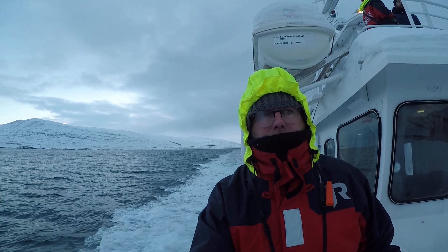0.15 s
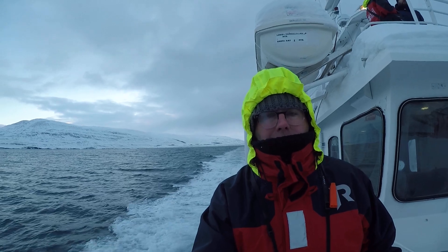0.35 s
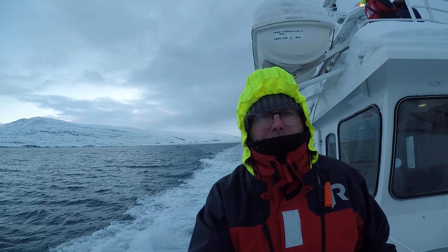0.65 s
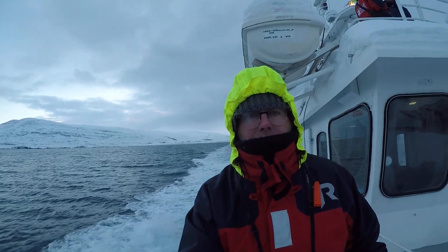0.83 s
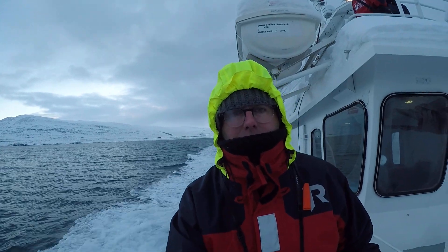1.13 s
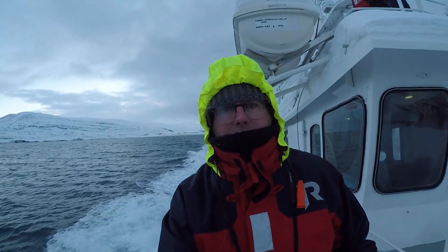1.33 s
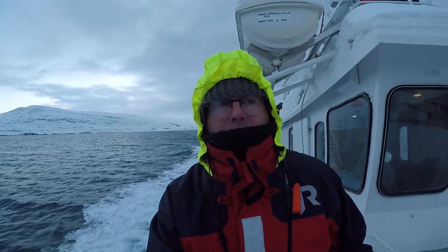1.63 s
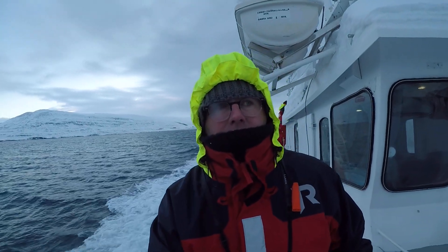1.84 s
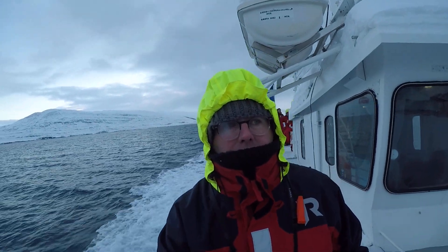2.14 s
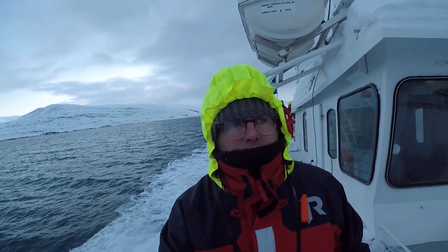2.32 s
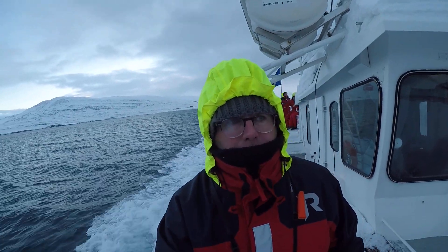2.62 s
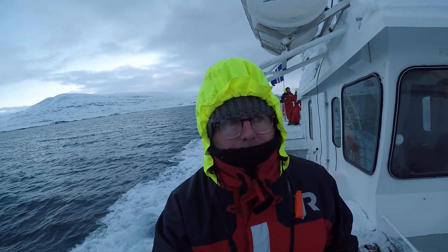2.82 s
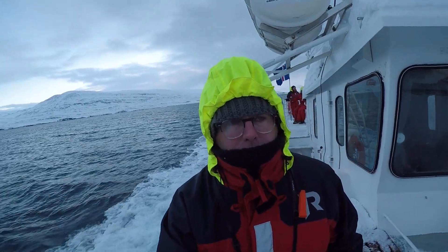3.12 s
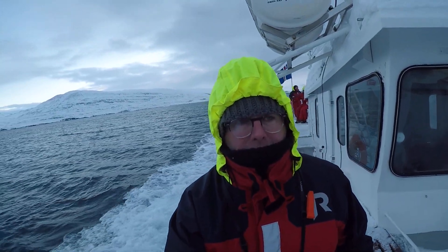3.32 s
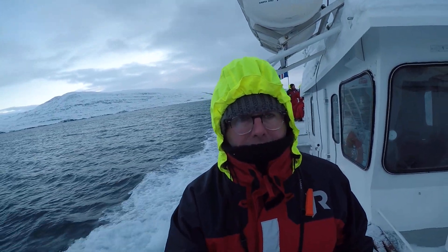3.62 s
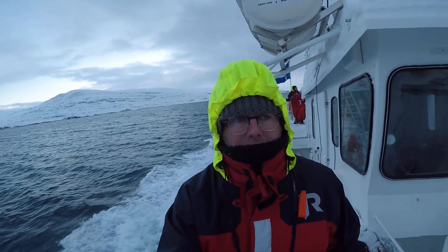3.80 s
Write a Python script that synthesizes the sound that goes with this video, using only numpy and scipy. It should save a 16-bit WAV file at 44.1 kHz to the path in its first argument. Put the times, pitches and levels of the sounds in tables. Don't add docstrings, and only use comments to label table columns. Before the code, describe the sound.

Boat engines drone deeply, two nearly matched low hums beating against each other, over exhaust rumble, churning foam and hissing spray; continuous, on an open side deck at sea, through a slightly muffled boxed microphone.

```python
import sys
import numpy as np
from scipy import signal
from scipy.fft import rfft, irfft
from scipy.io import wavfile

SR = 44100
rng = np.random.default_rng(int(sys.argv[2]) if len(sys.argv) > 2 else 0)


def pcm_store(signal):
    levels = np.round(np.clip(np.atleast_2d(signal), -1, 1) * 32767)
    wavfile.write(sys.argv[1], SR, levels.astype(np.int16).T)


def decibels_to_gain(level_db):
    exponent = np.asarray(level_db, float) / 20
    return 10 ** exponent


N = 174636

NEAR_HZ, FAR_HZ = 40.186, 41.787
IN_STEP_S = 2.5841


def rms_one(x):
    return x / np.sqrt(np.mean(x ** 2) + 1e-20)


def in_time(rows):
    start_s, *columns = np.transpose(rows)
    return [np.interp(np.arange(N) / SR, start_s, column) for column in columns]


def drift(rate_hz):
    r = np.exp(-80 * np.pi * rate_hz / SR)
    noise = rng.standard_normal(N // 40 + 2002)
    slow = signal.lfilter([1], [1, -2 * r, r * r], noise)[2000:]
    return np.interp(np.arange(N) / 40, np.arange(len(slow)), rms_one(slow))


def patchy(x, spectrum, patchy_db, rate_hz, swing=lambda hz: 0):
    hz = np.maximum(np.arange(N // 2 + 1) * SR / N, 1)
    point_hz, point_db = np.transpose(spectrum)
    colour_db = np.interp(np.log(hz), np.log(point_hz), point_db, left=-99, right=-99)
    coloured = rfft(x) * decibels_to_gain(colour_db)
    together = drift(rate_hz)
    place = 3 * np.log2(hz)
    first, last = int(3 * np.log2(point_hz[0])), int(3 * np.log2(point_hz[-1])) + 1
    out = 0
    for k in range(first, last + 1):
        window = np.cos(np.pi / 2 * np.clip(place - k, -1, 1)) ** 2
        band = irfft(coloured * window, N)
        flicker_db = patchy_db * (0.6 * together + drift(rate_hz))
        out = out + band * decibels_to_gain(flicker_db + swing(2 ** (k / 3)))
    return rms_one(out)


def engine(firing_hz, orders):
    wander_rad, wander_db = 0.03, 0.3
    steady = 2 * np.pi * firing_hz * (np.arange(N) / SR - IN_STEP_S)
    turn = steady + wander_rad * drift(2.8)
    drone = 0
    for multiple, level_db in orders:
        drone = drone + decibels_to_gain(level_db + wander_db * drift(4.1)) * np.cos(multiple * turn)
    return drone


# multiple [of firing rate], level_db [peak dB]
NEAR_TONES = [(2, -10.8), (3, -26.3), (1, -42), (1.758, -35), (5, -41)]
# [dB, exhaust roar]
ENGINE_LOAD = [
    (0, -1.2, -0.5),
    (.6, -0.5, 4.5),
    (1.2, -1, 4.5),
    (1.7, 1, 1),
    (2.3, 1.1, 0),
    (2.8, 1, -5),
    (3.2, .8, -2.5),
    (3.96, -1.7, 0),
]


def near_engine():
    drone_db = in_time(ENGINE_LOAD)[0]
    return decibels_to_gain(drone_db) * engine(NEAR_HZ, NEAR_TONES)


# multiple [of firing rate], level_db [peak dB]
FAR_TONES = [(2, -18.2), (3, -29), (1, -36), (4, -29), (5, -32), (8 / 3, -33), (5 / 3, -37)]


def far_engine():
    return engine(FAR_HZ, FAR_TONES)


def difference_tone():
    pitch_hz = 2 * (2 * NEAR_HZ - FAR_HZ)
    return -decibels_to_gain(-33) * np.cos(2 * np.pi * pitch_hz * (np.arange(N) / SR - IN_STEP_S))


# pitch_hz [Hz], level_db [dB per Hz]
RUMBLE_COLOUR = [(6, -17), (27, -9.5), (42, -5), (66, -2.5), (86, -4.5), (122, -0.5), (160, -7), (420, -21)]


def rumble():
    roar_db = in_time(ENGINE_LOAD)[1]
    swing = lambda hz: roar_db * (95 < hz < 150)
    noise = rng.standard_normal(N)
    return decibels_to_gain(-21.5) * patchy(noise, RUMBLE_COLOUR, patchy_db=0.3, rate_hz=5.1, swing=swing)


# [dB, deep wash]
CHURNING = [(0.12, -24.5, -29.5), (0.28, -24.5, -25), (0.56, -21.5, -29), (0.86, -24.5, -31.5),
            (1.73, -25.5, -31.5), (1.77, -23, -27), (1.8, -24, -36), (1.84, -22.5, -29), (2.11, -24, -30),
            (2.16, -28, -33), (2.21, -27, -26.5), (2.28, -27, -31.5), (2.44, -24, -33), (2.77, -27, -35.5),
            (3.05, -26, -32), (3.21, -25, -34), (3.92, -23, -34)]
# pitch_hz [Hz], level_db [dB per Hz]
FOAM_COLOUR = [(150, -30), (250, -1), (313, -4.5), (750, -5), (1820, -2.5), (2370, -5), (3200, -14.5),
               (4160, -23), (7040, -120)]


def foam():
    bubbles_per_s, bubble_db, deep_hz = 2500, -9, 800
    level_db, deep_db = in_time(CHURNING)
    sizes = decibels_to_gain(2.95 * np.minimum(rng.exponential(1, N), 5))
    bursts = sizes * (rng.random(N) < bubbles_per_s / SR)
    pitch_number = rng.integers(0, 20, N)
    rings = 0
    for k, hz in enumerate(np.geomspace(400, 2800, 20)):
        r = np.exp(-np.log(1000) * hz / (9.0 * SR))
        w = 2 * np.pi * hz / SR
        hits = bursts * (pitch_number == k) + 1e-18
        ring = signal.lfilter([0, np.sin(w)], [1, -2 * r * np.cos(w), r * r], hits)
        rings = rings + ring * np.sqrt(hz)
    water = 0.43 * decibels_to_gain(bubble_db) * rms_one(rings) + rng.standard_normal(N)
    apart_db = 0.63 * (deep_db - deep_db.mean() - level_db + level_db.mean())
    swing = lambda hz: (290 < hz < deep_hz) * apart_db
    return decibels_to_gain(level_db + 2.0) * patchy(water, FOAM_COLOUR, patchy_db=0.4, rate_hz=5.4, swing=swing)


# [dB, fine mist]
SPRAY_THROWN = [(0.12, -25.5, -45), (0.52, -24, -49), (1.24, -26.5, -47.5), (1.32, -27.5, -49),
                (1.62, -25.5, -45), (1.9, -25, -45.5), (2.09, -28, -49.5), (2.11, -27, -47.5),
                (2.2, -28.5, -52), (2.41, -25.5, -49), (2.49, -24, -48), (3.04, -28.5, -51.5),
                (3.06, -25.5, -50), (3.51, -26, -49), (3.64, -24, -47), (3.92, -27, -49.5)]
# pitch_hz [Hz], level_db [dB per Hz]
DROPLET_COLOUR = [(2400, -47), (3100, -15.5), (3700, -5), (4450, 0), (5300, -3.5), (6600, -10), (7600, -14),
                  (8400, -27.5)]
# pitch_hz [Hz], level_db [dB per Hz]
MIST_COLOUR = [(7400, -10), (8500, 1), (10100, -3), (11200, -13), (12500, -18.5), (14200, -20),
               (14700, -26), (15300, -36)]


def spray():
    level_db, mist_db = in_time(SPRAY_THROWN)
    drops = rng.standard_normal((2, N)) * decibels_to_gain(1.7 * rng.exponential(1, (2, N)))
    droplets = patchy(drops[0], DROPLET_COLOUR, patchy_db=0.63, rate_hz=3.4)
    mist = patchy(drops[1], MIST_COLOUR, patchy_db=0.6, rate_hz=4.6)
    return decibels_to_gain(level_db + 1.06) * droplets + decibels_to_gain(mist_db + 0.9) * mist


def scene():
    engines = near_engine() + far_engine() + difference_tone()
    wake = foam() + spray()
    return (engines + rumble() + wake)[None]


def band_limit(x):
    return signal.sosfilt(signal.butter(12, 15750, fs=SR, output="sos"), x)


def record(dry):
    start_s, fade_in_s, fade_out_s = 0.0694, 0.0001, 0.002
    ceiling, top_hz = 1.3, 15500
    s = np.arange(N) / SR
    fade_in = np.clip((s - start_s) / fade_in_s, 0, 1)
    fade_out = np.clip((s[-1] - s) / fade_out_s, 0, 1)
    rounded = ceiling * np.tanh(dry / ceiling)
    top_cut = signal.cheby2(10, 50, top_hz, fs=SR, output="sos")
    return band_limit(fade_in * fade_out * signal.sosfilt(top_cut, rounded))


dry = scene()
out = record(dry)
pcm_store(out)
```